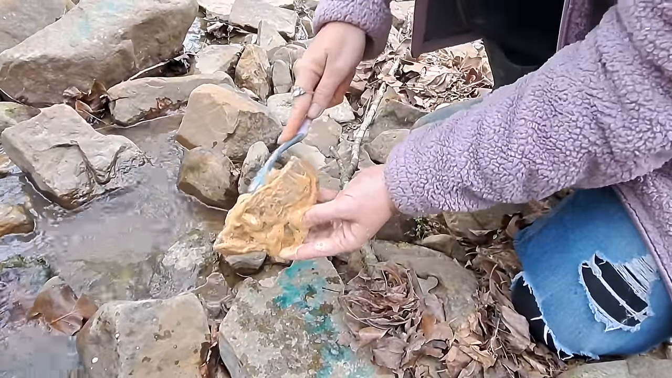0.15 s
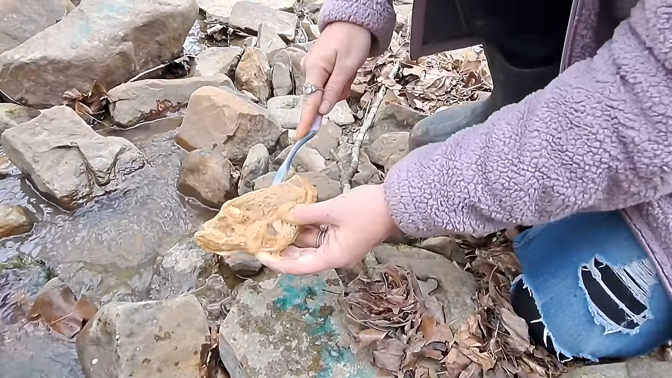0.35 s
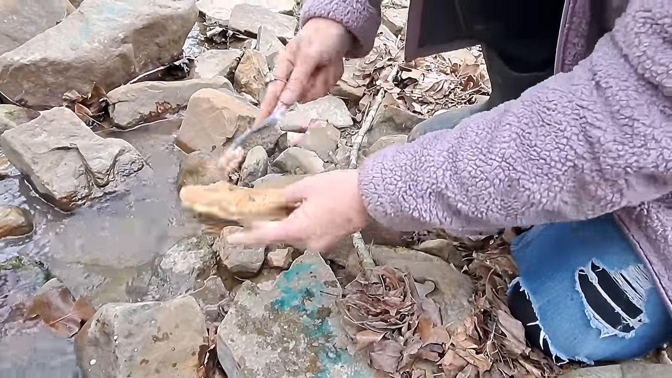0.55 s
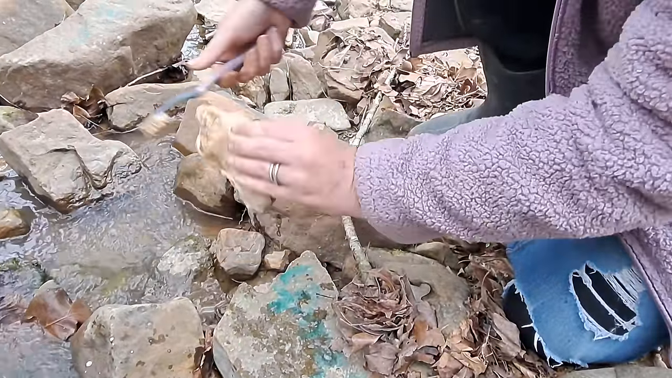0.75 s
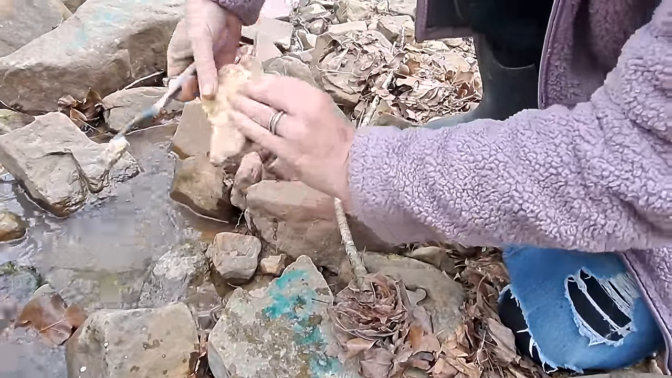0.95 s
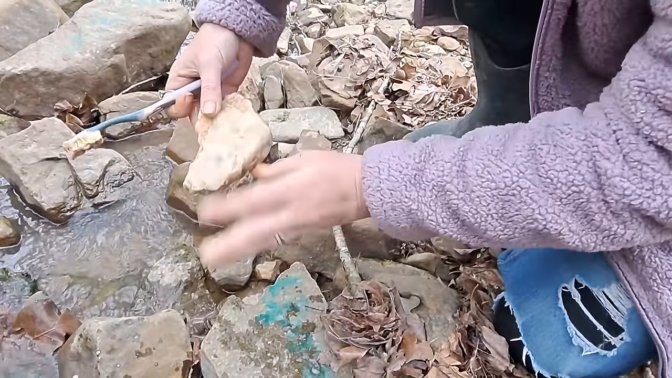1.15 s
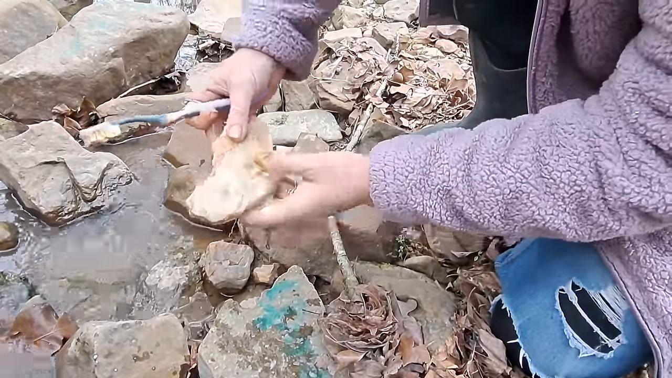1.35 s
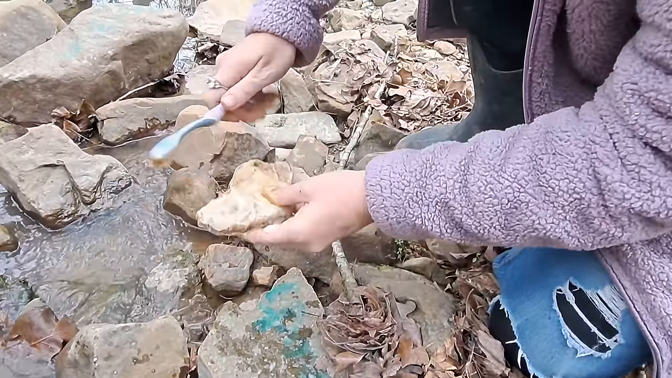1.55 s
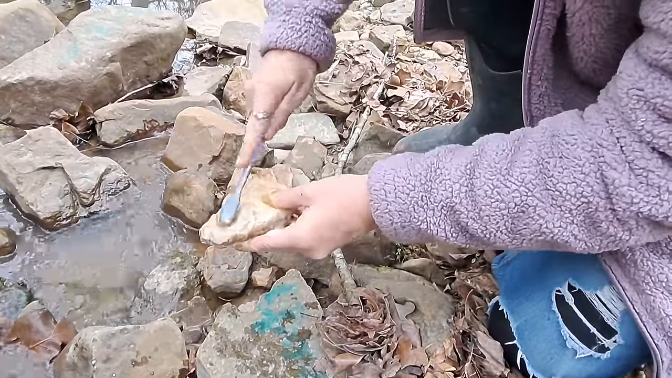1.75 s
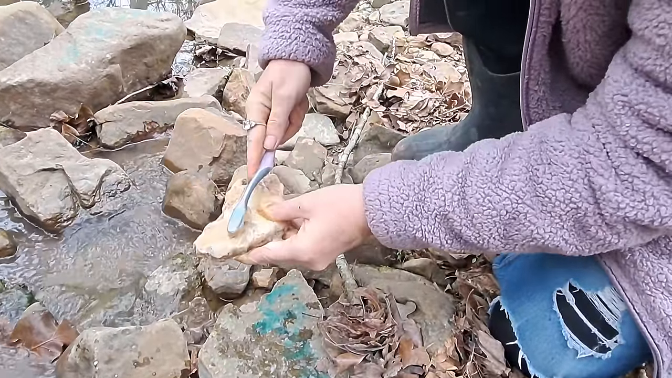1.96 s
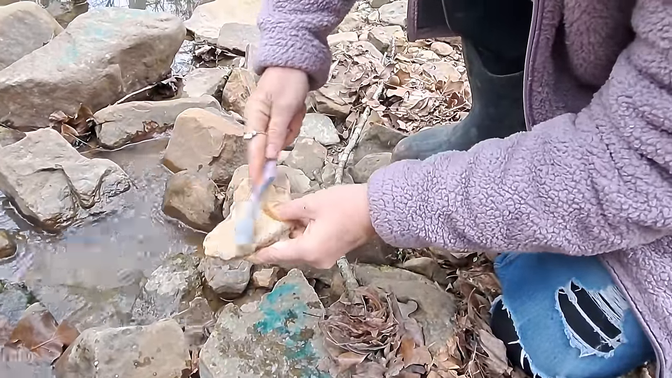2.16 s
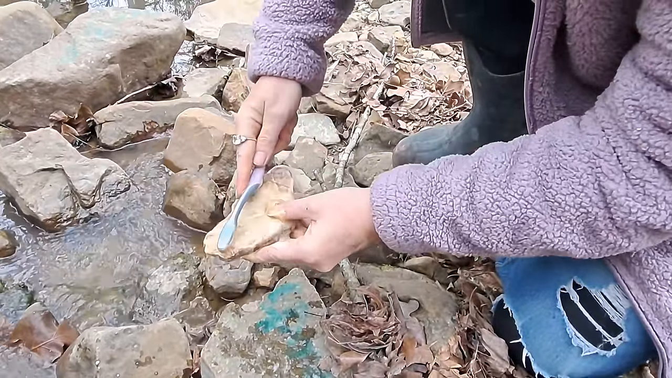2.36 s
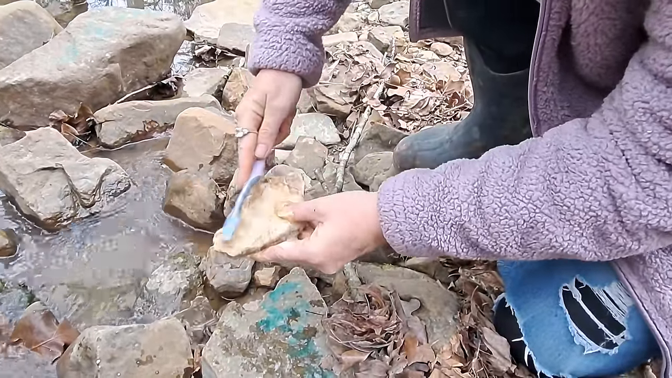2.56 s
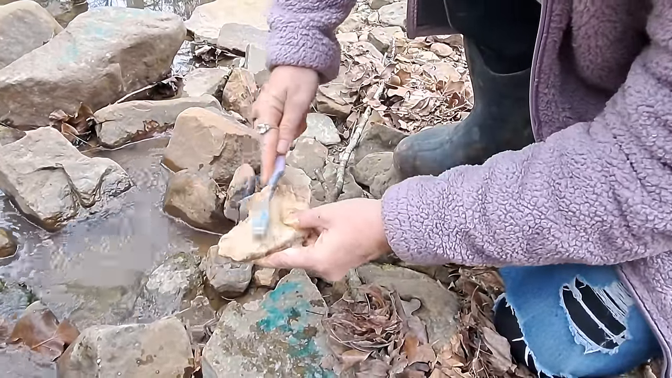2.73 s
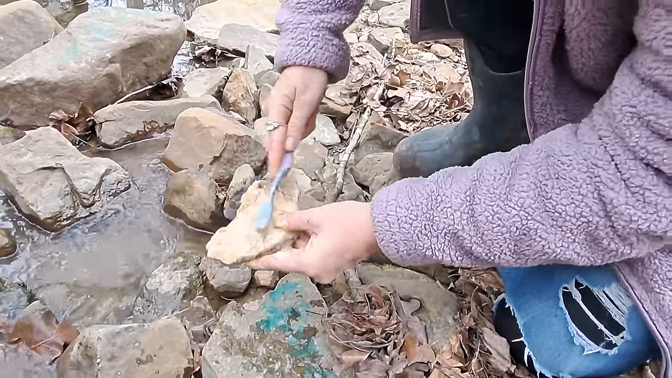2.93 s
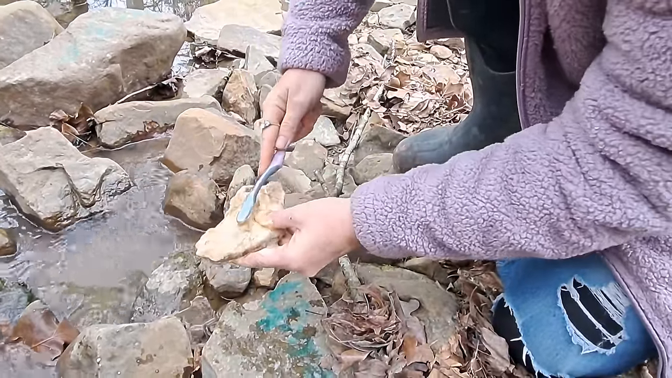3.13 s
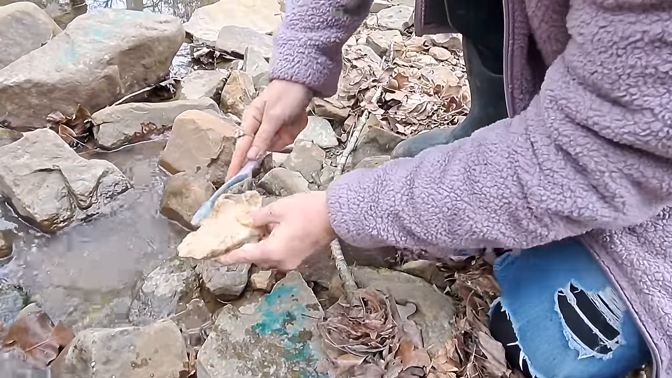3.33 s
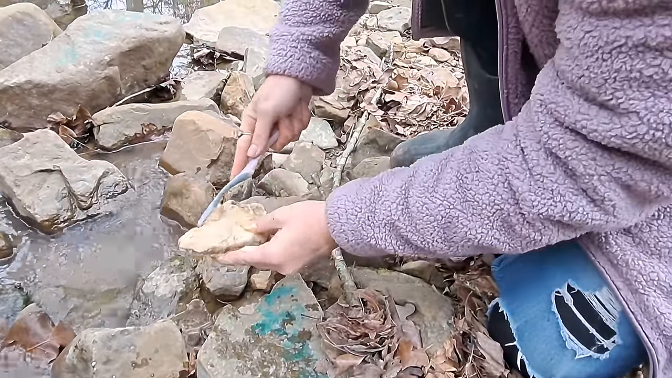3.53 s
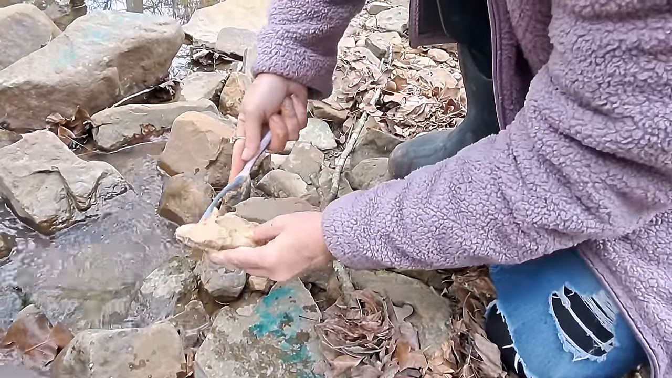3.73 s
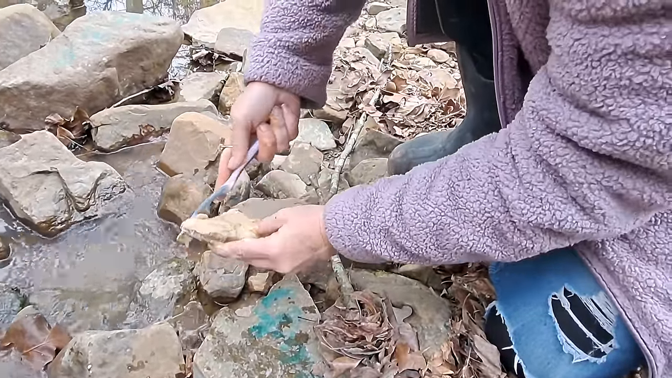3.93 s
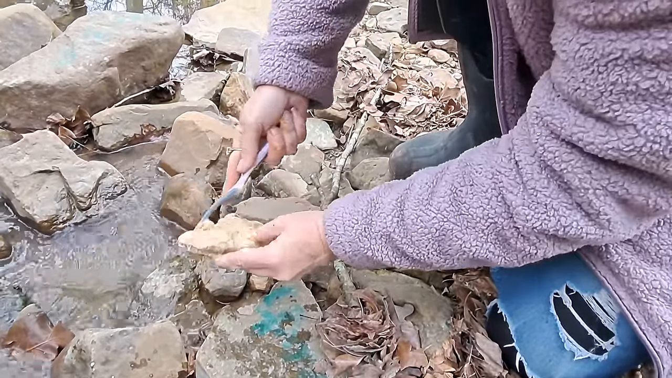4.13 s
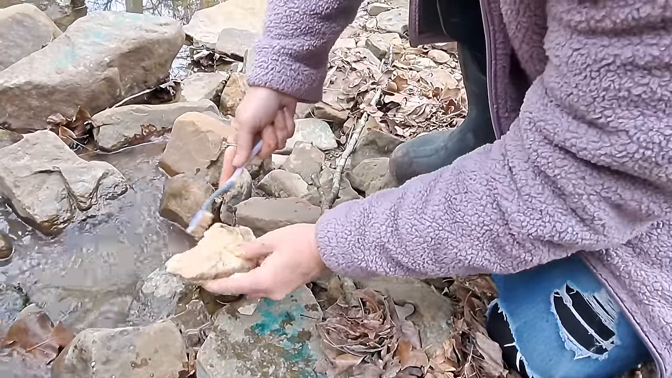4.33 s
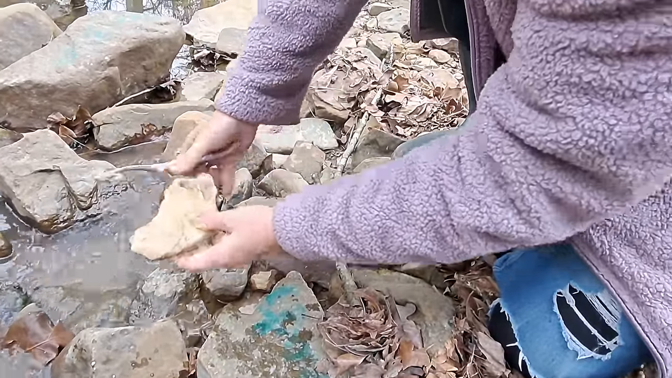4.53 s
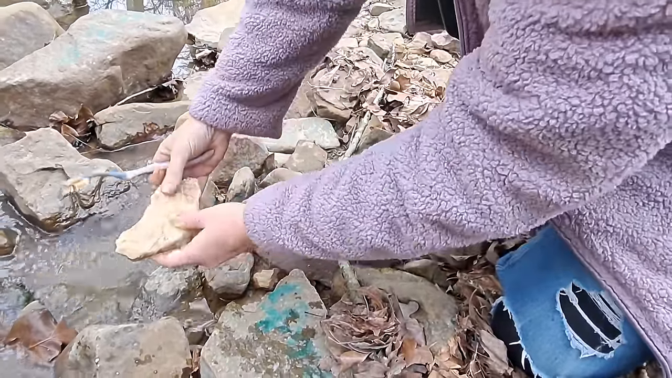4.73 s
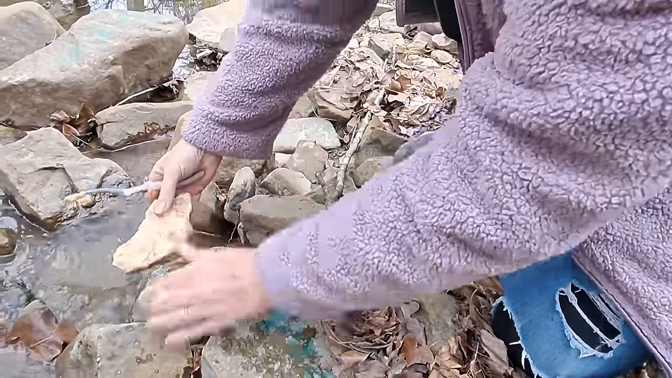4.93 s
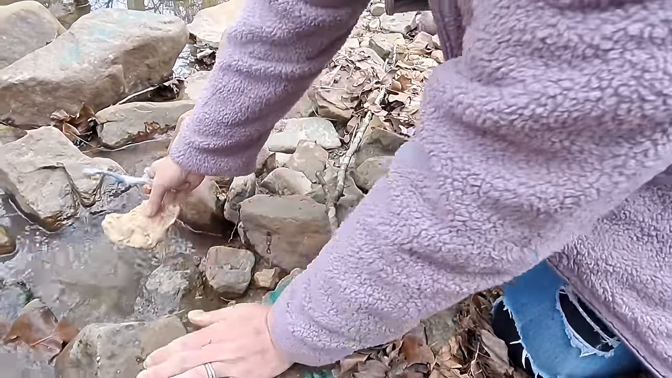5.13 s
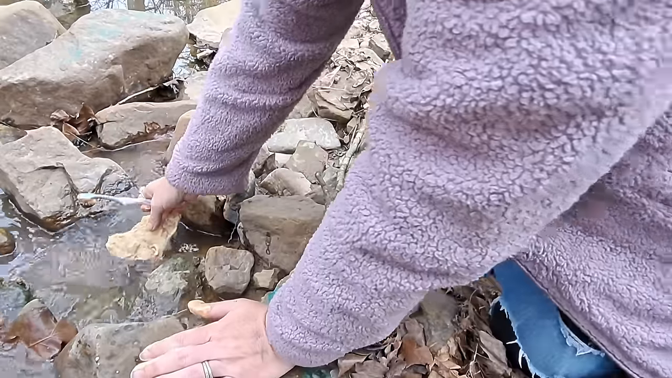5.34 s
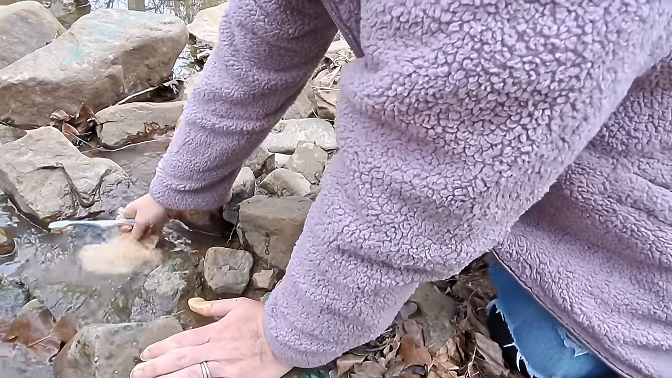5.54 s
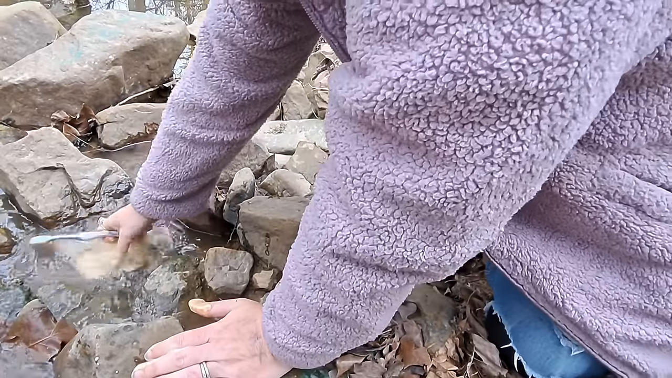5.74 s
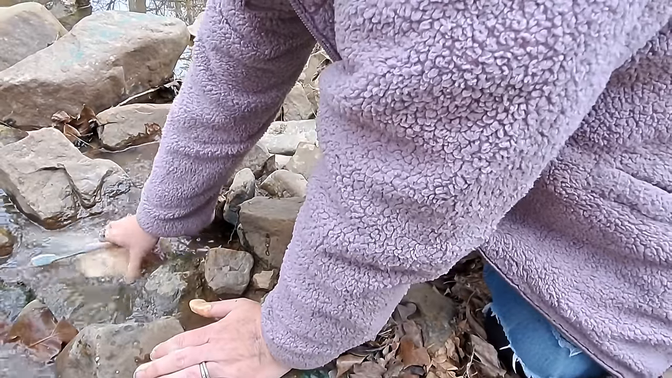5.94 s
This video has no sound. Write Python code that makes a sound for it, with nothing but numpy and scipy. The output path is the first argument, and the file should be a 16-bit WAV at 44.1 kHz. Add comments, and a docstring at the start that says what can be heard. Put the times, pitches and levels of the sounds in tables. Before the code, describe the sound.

Close bristles scrub a gritty crystal in short dry bursts while a shallow creek plops and tinkles, then the crystal is dunked twice.

```python
"""Quick strokes of a small plastic brush come first, close by, scrubbing a wet, rough crystal: clouds of clicks.
Around it a shallow creek trickles between stones: low plops and high pings are ringing bubbles,
fine spray is tiny clicks, and farther water is a soft rush of noise. Near the end the crystal is dunked
twice and the water gulps, as trapped pockets of air ring and die quickly. Sleeves rumble dully, made of
filtered noise, and a faint drone, noise narrowed to a low hum, comes and goes far off."""
import sys
import numpy as np
from scipy import signal
from scipy.fft import rfft, irfft
from scipy.io import wavfile

SR = 44100
rng = np.random.default_rng(int(sys.argv[2]) if len(sys.argv) > 2 else 0)


def transcribe(u):
    """Save the signal u as a 16-bit wav file named by the first command-line argument.

    u: samples, shape (n,) or (channels, n), limited to [-1, 1]; the rate is SR.
    q: integer samples, one column per channel.
    """
    v = np.clip(np.atleast_2d(u).T, -1, 1)
    q = np.round(v * 32767).astype(np.int16)
    wavfile.write(sys.argv[1], SR, q)


N = 268128
TIME = np.arange(N) / SR   # seconds

# In the colour tables only the differences between levels matter: the filter evens out the total.
# brush strokes: middle_s, length_s, level_db, fizz_db (treble compared with the stroke)
STROKES = [(0.037, 0.12, -37, -1.5), (0.169, 0.072, -37, -3), (0.33, 0.058, -30, -15),
           (1.855, 0.055, -39.5, 1.5), (1.969, 0.089, -33, -0.5), (2.113, 0.072, -34.5, 1),
           (2.218, 0.086, -30, -1), (2.353, 0.083, -32.5, -2), (2.497, 0.071, -34.5, -1),
           (2.602, 0.086, -33.5, -1.5), (2.727, 0.058, -31, -4.5), (2.82, 0.074, -34.5, 1),
           (2.927, 0.069, -30.5, 1.5), (2.98, 0.095, -37, -8), (3.224, 0.12, -37.5, -5.5),
           (3.353, 0.14, -39.5, -5), (3.499, 0.08, -43.5, 0), (3.622, 0.13, -44, -3),
           (3.782, 0.085, -40, 0.5), (3.878, 0.069, -38.5, -3.5), (4.055, 0.1, -35.5, -0.5),
           (4.164, 0.068, -37.5, -2), (4.316, 0.085, -34, -3.5)]
# bristle tufts snapping off a ridge: start_s, level_db
SNAPS = [(0.31, -21.5), (2.297, -27.5), (2.586, -32), (2.945, -29.5)]
# tone of bristles on stone: pitch_hz, left_db, right_db
BRISTLE_COLOUR = [(304, -32.5, -26.5), (610, -27, -21.5), (930, -15, -11), (1660, -11, -5),
                  (2400, -3, -4.5), (3300, -9, -2), (4000, -6, 0.5), (4850, -8, 1.5), (6400, -8.5, 2.5),
                  (7330, -5, -7.5), (8500, -9, -21), (10900, -6, -16), (12600, -2.5, -8), (15400, -9, -16)]
# the crystal is dunked: start_s, level_db (before the lift in dunk), first_pocket_hz, gulp_length_s,
# later_pockets_db (before the same lift)
DUNKS = [(5.3668, -22, 610, 0.07, -33), (5.533, -31, 494, 0.095, -34.5)]
# the nearest bubbles in the creek, and (at 5.372, 5.570 and 5.594 s) pockets left ringing after the dunks:
# start_s, level_db (before the lift in near_bubbles), pitch_hz
NEAR_BUBBLES = [(0.241, -39, 2720), (0.334, -35, 763), (0.487, -32.5, 2590), (0.575, -40.5, 758),
                (0.726, -37.5, 2750), (0.881, -42, 693), (0.958, -38, 900), (1.253, -35.5, 900),
                (1.292, -34.5, 797), (1.516, -38, 2680), (1.697, -28.5, 3640), (1.795, -34.5, 1830),
                (2.072, -30, 2680), (2.147, -33.5, 1100), (2.201, -35.5, 900), (2.312, -35.5, 814),
                (2.466, -37.5, 743), (2.657, -35, 1090), (2.776, -27.5, 2210), (2.913, -29, 856),
                (3.262, -37.5, 930), (3.388, -35.5, 864), (3.428, -31.5, 850), (3.573, -36, 650),
                (3.956, -35, 2650), (4.114, -39.5, 853), (4.375, -31.5, 3680), (4.471, -33, 3450),
                (4.529, -35, 1104), (4.544, -33.5, 876), (4.604, -31.5, 2800), (4.969, -33.5, 1044),
                (5.006, -33.5, 840), (5.084, -39.5, 618), (5.372, -34, 616), (5.570, -37, 750),
                (5.594, -35.5, 900), (5.803, -34, 779)]
# small splashes: start_s, level_db (before the trims in splashes), slap_t60_s, middle_drop_pitch_hz
SPLASHES = [(0.485, -35, 0.061, 2900), (0.67, -35, 0.027, 3000), (0.885, -31.5, 0.018, 4000),
            (1.245, -34.5, 0.029, 3430), (1.414, -34.5, 0.017, 5500), (4.119, -27, .02, 4000),
            (4.41, -30.5, 0.01, 2600), (4.611, -33, 0.039, 3000), (4.969, -36, 0.026, 2700),
            (5.127, -30, 0.011, 5500), (5.163, -26, 0.02, 3200), (5.192, -30.5, .06, 1500),
            (5.222, -35, 0.042, 2280), (5.268, -32.5, 0.017, 5140), (5.338, -30.5, 0.0075, 2640),
            (5.934, -39, 0.043, 3300), (5.97, -37, 0.081, 4560)]
# tone of splashing water: pitch_hz, left_db, right_db
SPLASH_COLOUR = [(400, 10, -10), (1300, 10, 28), (3200, 21, 6.5), (6600, 5, 21.5), (8650, 13.5, -7),
                 (15500, -4, 4)]
# the closest ticks of spray: start_s, level_db (before the lift in spray)
CLOSE_TICKS = [(0.488, -17.5), (1.2, -25), (1.728, -23), (1.855, -15.5), (2.177, -16), (2.295, -17),
               (2.704, -11), (3.485, -15.5), (3.927, -17), (4.121, -15.5), (4.812, -22)]
# tone of bursting droplets: pitch_hz, left_db, right_db
SPRAY_COLOUR = [(1000, -22, -39), (4150, -15, -48), (6800, 10, 0), (9400, 7.5, -44), (13800, 13, -7),
                (15600, -19, -10)]
# how lively the trickle and the wash are: time_s, gain_db
FLOW = [(0, 4.5), (.5, 9), (1.05, 4), (1.3, 7.5), (1.64, 1.5), (1.85, 9.5), (2.45, 4.5), (3.1, 7),
        (4.7, 4.5), (5.2, 7), (5.46, 5.5), (5.65, 7), (6.08, 7.5)]
# tone of the farther water: pitch_hz, left_db, right_db
WASH_COLOUR = [(24.7, -20, -7.5), (55, -16.5, 5), (85, -6, -12), (120, 2.5, 6), (172, -0.5, 6),
               (308, -6.5, 2.5), (474, -6.5, -7.5), (900, 2.5, 7), (1860, -2, 0.5), (2900, -3.5, 5.5),
               (3800, 2, -9.5), (6470, -5.5, 2.5), (8900, -7, -33), (12600, -11.5, -12), (15000, -5.5, -12)]
# dull rumble of sleeves and hands moving: time_s, level_db (of the rub)
SLEEVES = [(0, -67.5), (.7, -67), (1.3, -70.5), (2.3, -75.5), (2.8, -62.5), (3.3, -77), (4.1, -67),
           (4.6, -75), (5.6, -61), (6.08, -80)]
# far drone: time_s, level_db
DRONE = [(0, -62.5), (.2, -61.5), (.45, -68.5), (1.0, -72), (1.4, -62), (1.6, -60), (1.85, -86),
         (4.5, -77.5), (6.08, -61.5)]

BRUSH_LAG_S, CREEK_LAG_S = 0.00014, 0.00037   # the left ear hears both first


def from_db(db):
    """Turn decibels into a gain to multiply by."""
    return 10 ** (np.asarray(db) / 20)


def rms_one(x):
    """Scale to an average strength (rms) of 1."""
    return x / np.sqrt(np.mean(x ** 2) + 1e-20)


def follow(table):
    """Read a table of times and decibels as a gain that moves in straight lines of decibels."""
    return from_db(np.interp(TIME, *np.transpose(table)))


def drift(rate):
    """Wander randomly with a spread of about 1, heading for a new value rate times a second."""
    knots = rng.standard_normal(4096)
    wander = np.interp(TIME * rate, np.arange(len(knots)), knots)
    return wander * np.sqrt(3 / 2)   # joining the knots by lines shrinks the spread


def add(out, s, sound):
    """Mix a sound in at time s, cutting off what runs past the end."""
    i = int(np.clip(round(s * SR), 0, N - 1))
    out[..., i:i + sound.shape[-1]] += sound[..., :N - i]


def high_pass(order, hz):
    """Design a filter that keeps what lies above hz."""
    return signal.butter(order, hz, "high", fs=SR, output="sos")


def resonance(x, hz, width_hz):
    """Ring at one pitch, like a small springy body, with gain 1 at its peak."""
    r = np.exp(-np.pi * width_hz / SR)
    feed = np.array([1, 0, -1]) * (1 - r * r) / 2
    return signal.lfilter(feed, [1, -2 * r * np.cos(2 * np.pi * hz / SR), r * r], x)


def colour(x, table, size=4096):
    """Give each ear its own tone; white noise keeps its power averaged over both ears."""
    hz, *ears = np.transpose(table)
    grid = np.log(np.fft.rfftfreq(size, 1 / SR) + 1)
    gains = from_db([np.interp(grid, np.log(hz), ear) for ear in ears])
    # folding the cepstrum makes the filter respond as early as it can (minimum phase)
    cepstrum = irfft(np.log(gains))
    cepstrum[:, 1:size // 2] *= 2
    cepstrum[:, size // 2 + 1:] = 0
    pulse = irfft(np.exp(rfft(cepstrum)))
    pulse = pulse / np.sqrt(np.sum(pulse ** 2) / 2)
    return signal.fftconvolve(np.atleast_2d(x), pulse, axes=1)[:, :N]


def two_ears(x, lag_s):
    """Let the right ear hear the sound a little later."""
    left, right = np.broadcast_to(x, (2, N))
    return np.array([left, np.roll(right, round(lag_s * SR))])


def left_right(pan_db):
    """Give the two ear gains; pan_db is left minus right."""
    return from_db(pan_db * np.array([[1], [-1]]) / 2)


def clicks(per_s, spread_db):
    """Scatter random clicks of uneven size, then scale the whole to rms 1."""
    sizes = from_db(spread_db * np.minimum(rng.exponential(1, N), 4))
    signed = sizes * rng.choice([-1, 1], N)
    return rms_one(signed * (rng.random(N) < per_s / SR))


def bubble(hz, t60, rise=0.32, onset_cycles=0.98):
    """A pocket of air rings, its pitch rising as it nears the surface; a neighbour shares the blow and beats.

    t60 is the time in seconds to fade by 60 dB; rise is the share the pitch gains in that time."""
    t = TIME[:int(t60 * SR) + 2]
    phase = 2 * np.pi * hz * t * (1 + rise * t / t60 / 2)
    neighbour = 0.3 * np.sin(phase * rng.uniform(0.8, 1.25))
    fade = from_db(-60 * t / t60)
    onset = 1 - np.exp(-t * hz / onset_cycles)
    return (np.sin(phase) + neighbour) * fade * onset


def brush(tuft_db=1.0, fizz_hz=7500, edge=2.37, snap_t60=0.022):
    """Thousands of bristle tips flick over the stone; whole tufts catch and let go on its ridges."""
    grit_db, grit_hz, grit_width_hz = -2.5, 1500, 700
    muddy_until_s = 1.0   # the muddy face is scrubbed first
    # both curves hold power, so that overlapping strokes add like separate noises
    pressure, fizz = np.zeros(N), np.zeros(N)
    for s, length, level_db, fizz_db in STROKES:
        t = TIME[:int(4 * length * SR)] + max(s - 2 * length, 0)
        stroke = from_db(level_db) * np.exp(-np.abs(2 * (t - s) / length) ** edge)
        add(pressure, t[0], stroke ** 2)
        add(fizz, t[0], (stroke * from_db(fizz_db)) ** 2)
    for s, level_db in SNAPS:
        snap = from_db(level_db - 60 * TIME[:SR // 10] / snap_t60)
        add(pressure, s, snap ** 2)
    tips = two_ears(clicks(per_s=12000, spread_db=3.5), BRUSH_LAG_S)
    # the rough faces of the crystal throw a different mix to each ear
    faces = np.array([clicks(per_s=20000, spread_db=2.5) for ear in range(2)])
    flicks = (tips + faces) * from_db(tuft_db * drift(260) + 1.9 * drift(60))
    # bristles of different free length take turns to ring
    for hz in np.geomspace(1200, 6300, num=9):
        turn = from_db(1.6 * drift(30.23)) - 1
        flicks = flicks + turn * resonance(flicks, hz, hz * 0.13)
    flicks = rms_one(flicks)
    high = signal.sosfiltfilt(high_pass(3, fizz_hz), flicks)
    scrub = (flicks - high) * np.sqrt(pressure) + high * np.sqrt(fizz)
    # grit on the muddy face adds a lower rasp
    rasp = resonance(scrub, grit_hz, grit_width_hz) * (TIME < muddy_until_s)
    return colour(scrub + from_db(grit_db) * rasp, BRISTLE_COLOUR)


def air_pockets(s, level_db, first_hz, length, later_db, count=4):
    """List the pockets of one gulp as (start_s, level_db, pitch_hz); each later one sheds two smaller ones."""
    start_share, sag_share = 0.8, 0.16   # later pitches start at this share of the first and sink by this share
    fade_db, scatter_db = 5.5, 3         # later pockets tend to weaken, and differ in strength
    churn_db, churn_octaves = -10, 0.65  # shed pockets are weaker and up to this much higher
    pockets = [(s, level_db, first_hz)]
    for k, (late, loud) in enumerate(rng.uniform(-1.01, 1, (count, 2))):
        through = (k + 1 + 0.22 * late) / (count + 0.5)   # share of the gulp gone by
        db = later_db - fade_db * k / count + scatter_db * loud
        hz = first_hz * start_share * (1 - sag_share * through)
        pockets.append((s + length * through, db, hz))
        for lag, size in rng.random((2, 2)):
            when = s + length * (through + lag / count)
            pockets.append((when, db + churn_db, hz * 2 ** (churn_octaves * size)))
    return pockets


def dunk(lift_db=4.5, pan_db=-1.0, lowest_hz=235, pocket_cycles=7.9):
    """The crystal slaps the water and traps a run of large, quickly damped pockets of air."""
    slap_db, slap_hz, slap_t60 = -4, 1300, 0.0092
    out = np.zeros(N)
    for s, level_db, first_hz, length, later_db in DUNKS:
        slap = bubble(slap_hz, slap_t60, rise=0.057, onset_cycles=0.25)
        add(out, s, from_db(level_db + lift_db + slap_db) * slap)
        for when, db, hz in air_pockets(s, level_db, first_hz, length, later_db):
            pocket = bubble(hz, pocket_cycles / hz, rise=0.08, onset_cycles=0.11)
            add(out, when, from_db(db + lift_db) * pocket)
    return signal.sosfilt(high_pass(2, lowest_hz), out) * left_right(pan_db)


def near_bubbles(lift_db=2.0, crack_db=-22, crack_t60=0.011):
    """Single plops and pings where the water drops over a stone, and a few pockets ringing on after the dunks;
    each pinches off with a tiny crack."""
    ring_cycles = 37.7   # each rings for the same number of cycles, so large ones ring longest
    mean_pan_db, pan_scatter_db = 0.5, 4
    rings, force = np.zeros((2, N)), np.zeros(N)
    for s, level_db, hz in NEAR_BUBBLES:
        pan_db = mean_pan_db + pan_scatter_db * rng.standard_normal()
        ring = bubble(hz, ring_cycles / hz, rise=0.24)
        add(rings, s, from_db(level_db + lift_db) * left_right(pan_db) * ring)
        add(force, s, from_db(level_db + crack_db - 60 * TIME[:SR // 20] / crack_t60))
    return rings + colour(force * rng.standard_normal(N), SPLASH_COLOUR)


def splashes(slap_db=-7, drops_db=-1, octaves=0.22, count=6):
    """Water slaps a stone and breaks into a short run of drops, each weaker than the last."""
    force, drops = np.zeros(N), np.zeros(N)
    for s, level_db, t60, middle_hz in SPLASHES:
        add(force, s, from_db(level_db + slap_db - 60 * TIME[:SR // 5] / t60))
        sizes = np.clip(rng.standard_normal(count), -2, 2)
        for late, size in zip(np.linspace(0, 0.4, count), sizes):
            hz = middle_hz * 2 ** (octaves * size * (late > 0))   # later drops scatter around the first pitch
            drop = from_db(level_db + drops_db - 9.2 * late) * bubble(hz, 16 / hz)
            add(drops, s + late * t60, drop)
    return colour(force * clicks(per_s=7100, spread_db=-1.0), SPLASH_COLOUR) + drops


def close_ticks(count=20, level_db=-30, spread_db=2):
    """Join the listed close ticks with a random scatter of weaker ones, before the lift in spray."""
    scatter = [(when * N / SR, level_db + spread_db * (2 * size - 1)) for when, size in rng.random((count, 2))]
    return list(CLOSE_TICKS) + scatter


def spray(lift_db=3.5, mist_db=-58, width_hz=1600, count=12):
    """Tiny bubbles burst with dry ticks at one of several pitches; a few are close and crack more broadly."""
    mist = from_db(mist_db) * clicks(per_s=110, spread_db=7.5)
    sizes = rng.integers(0, count, N)
    ticks = np.zeros(N)
    for k, hz in enumerate(np.linspace(4500, 15500, count)):
        ticks += resonance(mist * (sizes == k) + 1e-18, hz, width_hz)
    t = TIME[:SR // 200]
    for s, level_db in close_ticks():
        burst = rng.standard_normal(len(t)) * from_db(-60 * t / 0.0094)
        add(ticks, s, from_db(level_db + lift_db) * burst / np.linalg.norm(burst) / 2)
    return colour(ticks, SPRAY_COLOUR)


def trickle(count, centre_hz, octaves, level_db, spread_db, cycles, pan_db):
    """A swarm of small ringing bubbles around one size, scattered over the creek."""
    out = np.zeros((2, N))
    starts = rng.random(count) * N / SR
    traits = np.clip(rng.standard_normal((count, 4)), -2, 2)
    for when, (size, loud, place, ring) in zip(starts, traits):
        hz = centre_hz * 2 ** (octaves * size)
        gain = from_db(level_db + spread_db * loud) * left_right(pan_db + 9.3 * place)
        add(out, when, gain * bubble(hz, cycles / hz * 2 ** (ring / 2), rise=0.25))
    return out


def among_stones(x, echo_db, t60):
    """Stones close by scatter a short tail, different for each ear."""
    t = TIME[:SR // 5]
    tail = rng.standard_normal((2, len(t))) * from_db(-60 * t / t60) * (t > 0.0005)
    tail /= np.sqrt(np.sum(tail ** 2, axis=1, keepdims=True))
    return x + from_db(echo_db) * signal.fftconvolve(x, tail, axes=1)[:, :N]


def wash(level_db=-60, alike_below_hz=900):
    """Farther water blurs into a soft rush of noise, alike in both ears only in the bass."""
    low = signal.butter(2, alike_below_hz, fs=SR, output="sos")
    shared = two_ears(signal.sosfilt(low, rng.standard_normal(N)), CREEK_LAG_S)
    apart = signal.sosfilt(high_pass(2, alike_below_hz), rng.standard_normal((2, N)))
    apart = apart * from_db(2.43 * drift(90))
    return from_db(level_db) * colour(shared + apart, WASH_COLOUR)


def sleeves(rub_hz=170, thud_hz=57, thud_db=-4):
    """Fleece rubs and thuds softly as the arms move: unsteady noise heard through two low resonances."""
    push = rng.standard_normal(N) * from_db(2 * drift(27))
    rub = rms_one(resonance(resonance(push, rub_hz, 78), rub_hz, 78))
    thud = rms_one(resonance(resonance(push, thud_hz, 38), thud_hz, 38))
    return follow(SLEEVES) * (rub + from_db(thud_db) * thud)


def drone(hz=380, width_hz=170):
    """A low hum from far away, wavering because it is noise narrowed around one pitch."""
    hum = resonance(resonance(rng.standard_normal(N), hz, width_hz), hz, width_hz)
    return follow(DRONE) * rms_one(hum)


def scene():
    """Put the brush in front and the creek all around it."""
    flow = follow(FLOW)
    # levels here are before the flow gain
    plops = trickle(count=280, centre_hz=885, octaves=0.17, level_db=-53.0, spread_db=0.7, cycles=19.0, pan_db=-3)
    pings = trickle(count=1000, centre_hz=2460, octaves=0.459, level_db=-52.5, spread_db=4.0, cycles=28.3,
                    pan_db=-1)
    tinkle = trickle(count=650, centre_hz=5010, octaves=0.32, level_db=-56.0, spread_db=4.0, cycles=28.6,
                     pan_db=-15.0)
    prickle = trickle(count=420, centre_hz=12700, octaves=0.14, level_db=-51, spread_db=1.5, cycles=18.6,
                      pan_db=26.5)
    swarms = flow * (plops + pings + tinkle + prickle)
    water = swarms + dunk() + near_bubbles() + splashes() + spray()
    creek = among_stones(two_ears(water, CREEK_LAG_S), echo_db=-4.5, t60=0.059)
    return brush() + creek + flow * wash() + sleeves() + drone()


def record(dry, cutoff_hz=15900):
    """Cut the top treble steeply."""
    return signal.sosfilt(signal.ellip(10, 0.2, 70, cutoff_hz, fs=SR, output="sos"), dry)


dry = scene()
out = record(dry)
transcribe(out)
```